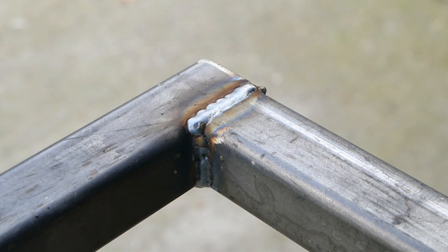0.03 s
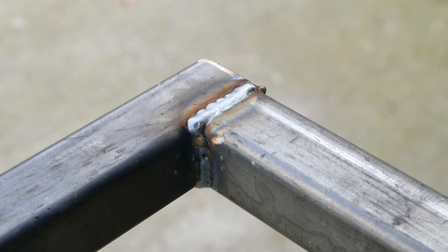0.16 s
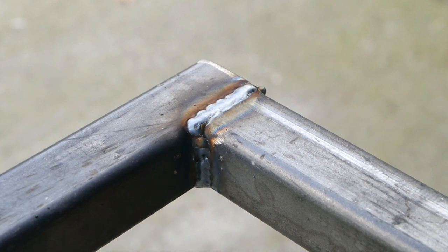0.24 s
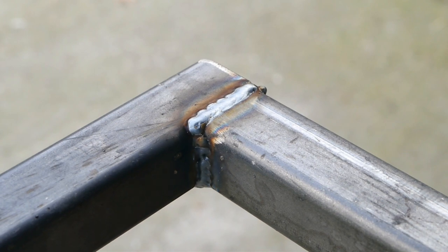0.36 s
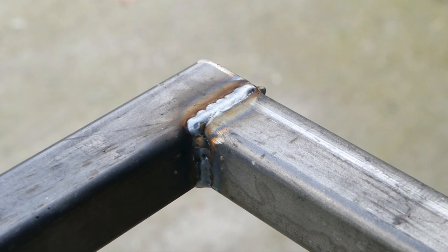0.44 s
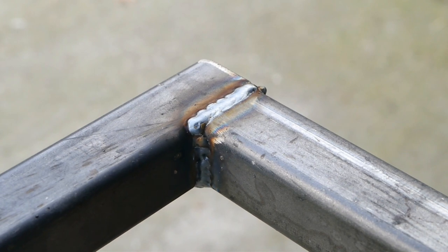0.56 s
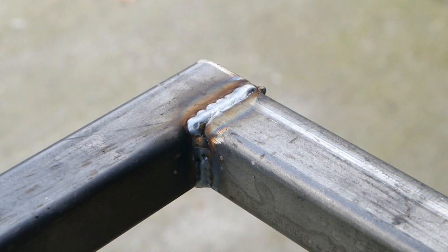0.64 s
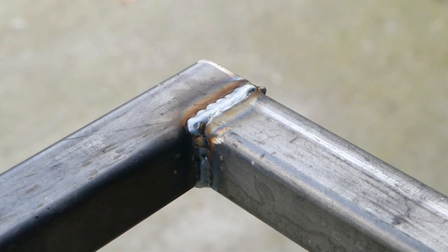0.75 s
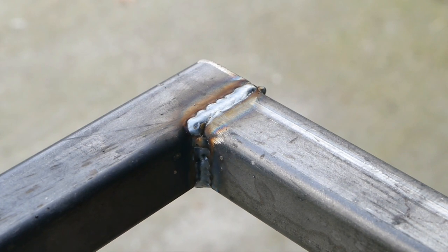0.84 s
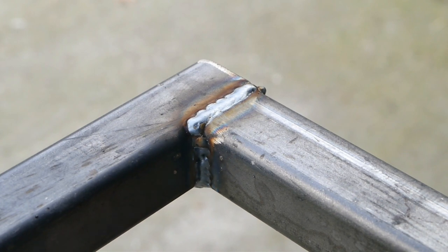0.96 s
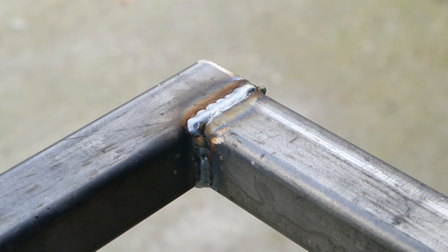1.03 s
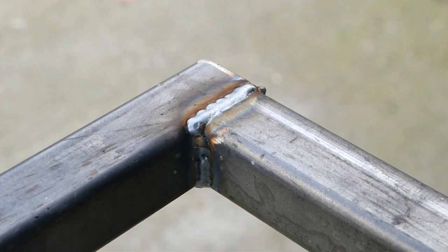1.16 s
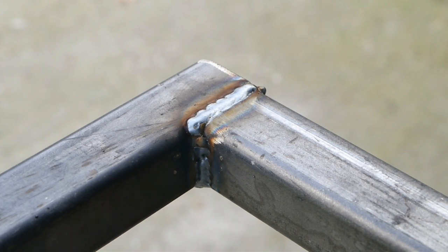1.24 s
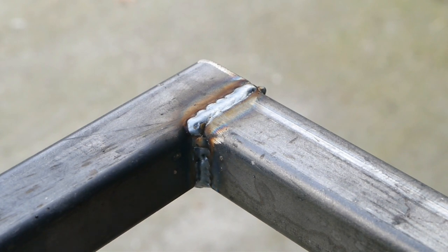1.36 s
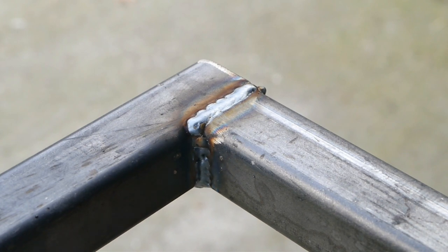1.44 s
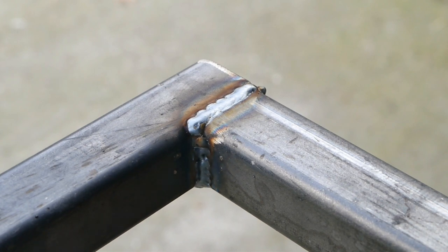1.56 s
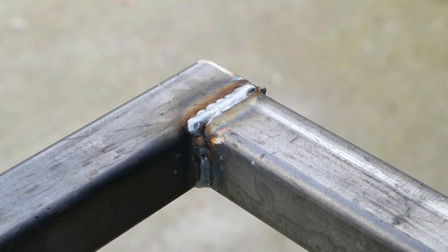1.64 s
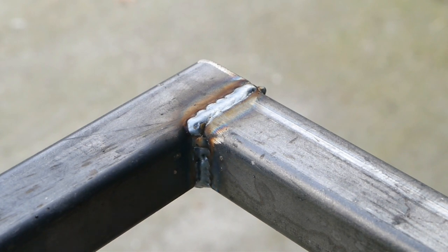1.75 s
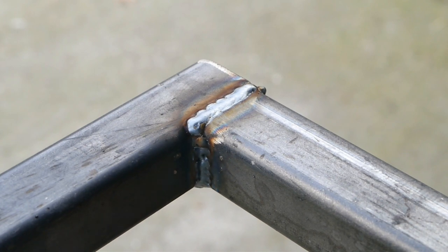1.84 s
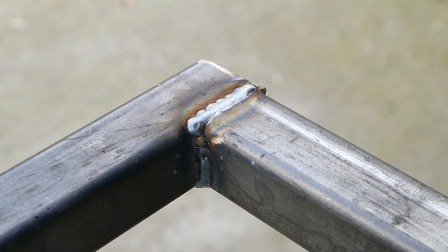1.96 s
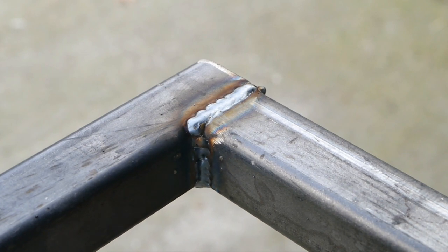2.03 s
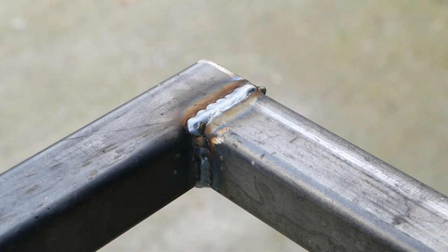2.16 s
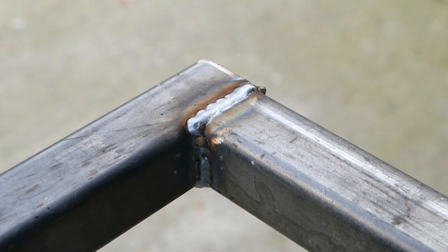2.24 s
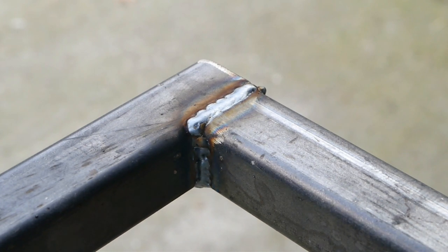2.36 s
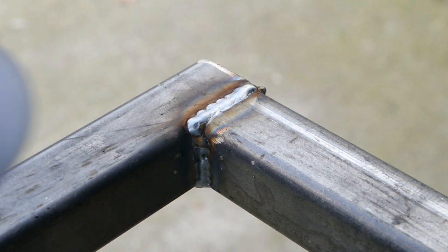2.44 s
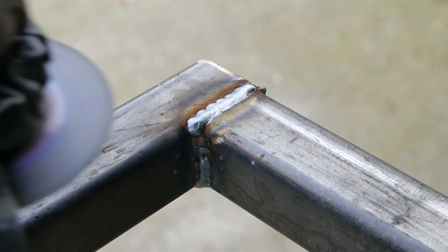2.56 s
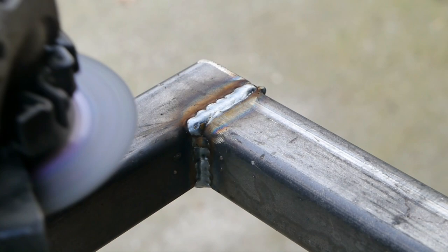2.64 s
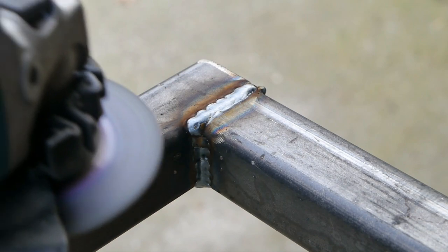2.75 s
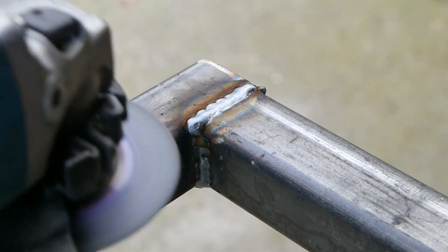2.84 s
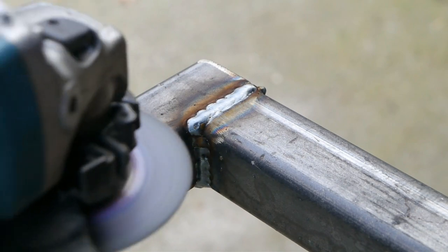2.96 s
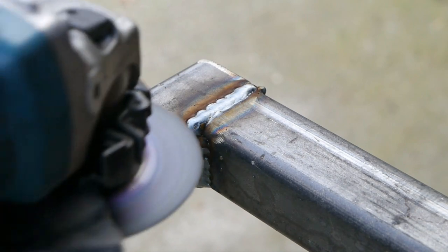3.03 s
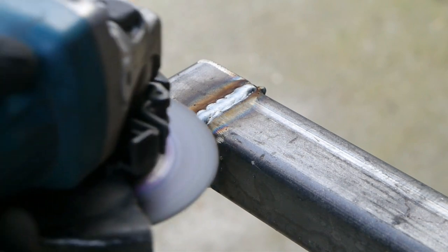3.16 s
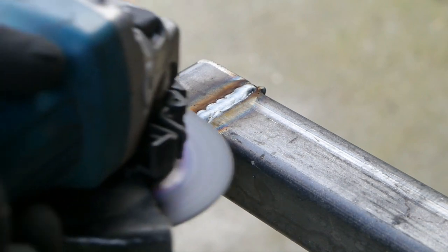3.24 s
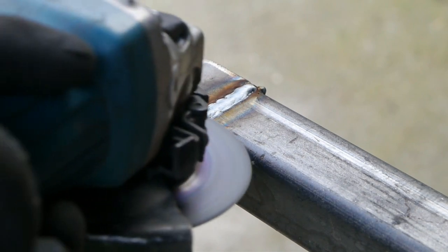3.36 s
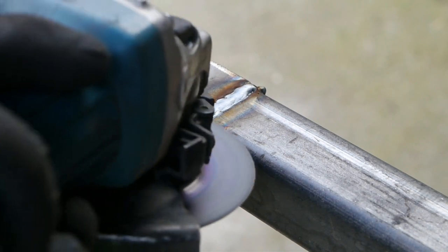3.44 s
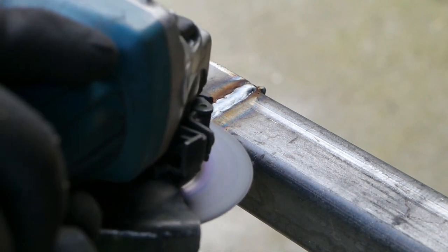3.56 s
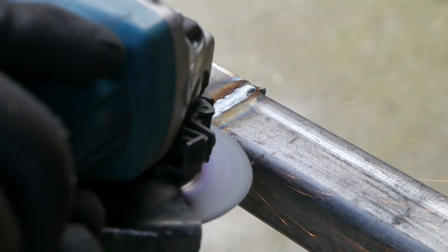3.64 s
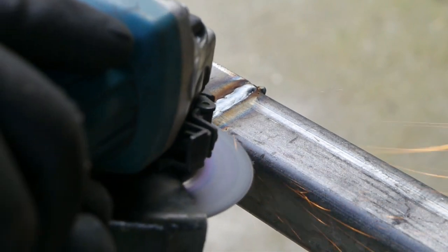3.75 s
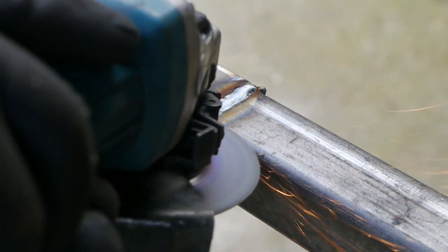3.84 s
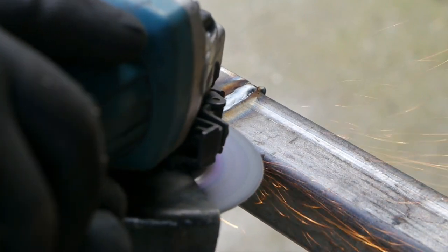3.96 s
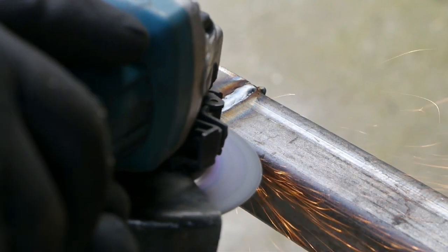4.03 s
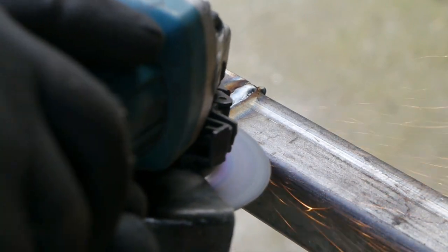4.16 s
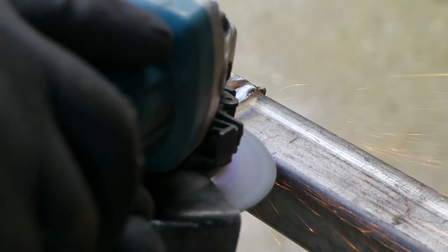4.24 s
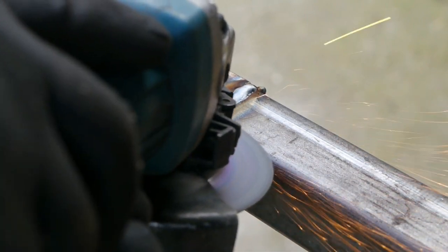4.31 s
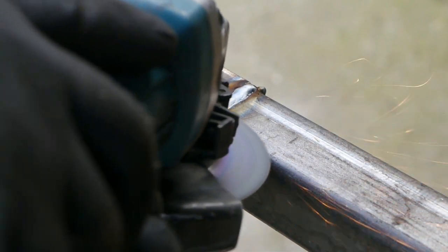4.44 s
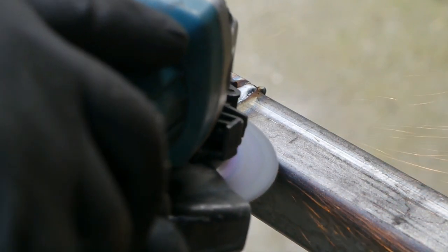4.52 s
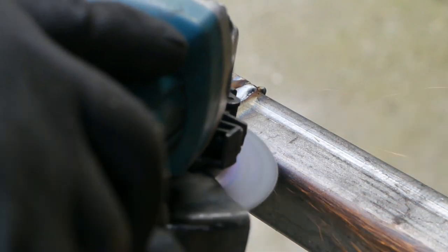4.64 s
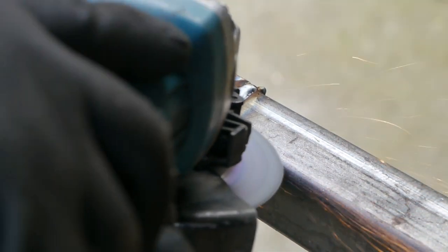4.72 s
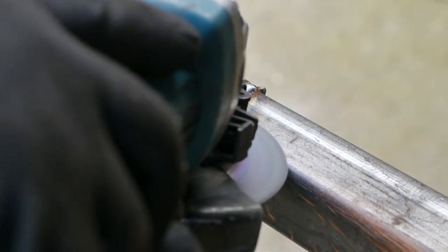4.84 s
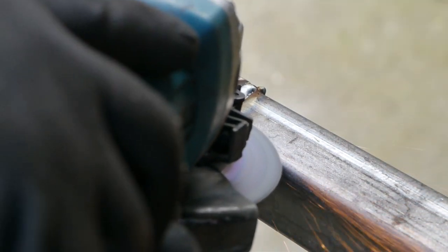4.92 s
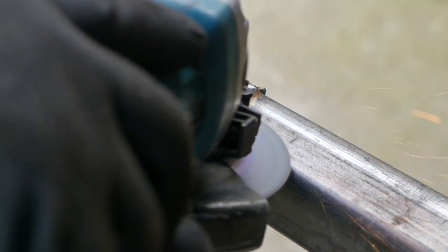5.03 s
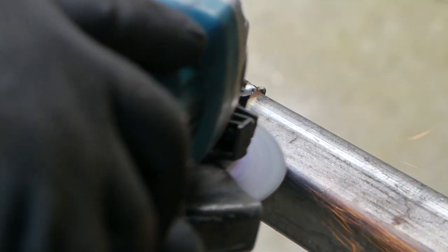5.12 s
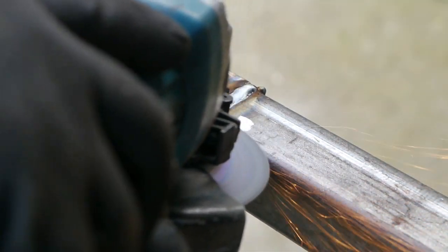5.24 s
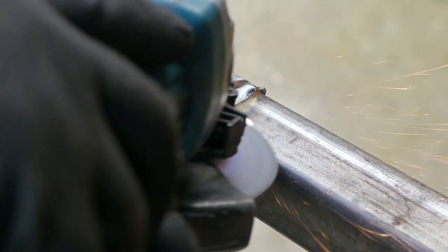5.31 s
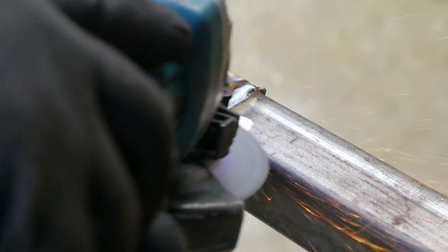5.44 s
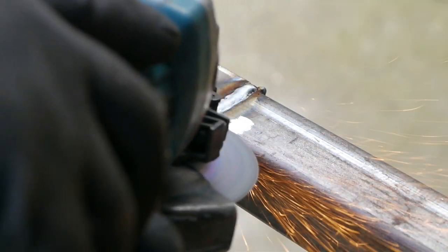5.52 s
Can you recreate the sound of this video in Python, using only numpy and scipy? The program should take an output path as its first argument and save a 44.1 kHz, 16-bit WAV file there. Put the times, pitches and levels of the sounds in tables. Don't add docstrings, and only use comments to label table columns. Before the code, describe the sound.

Close stereo microphone in a quiet open yard. Faint air, then sleeve rustle, plastic and metal taps and soft bumps as an angle grinder is handled. A scrape and very loud switch snap start the motor on the left; it chatters, climbs fast into a fan roar with rising whistle, and moves to the centre. The disc skips, then grinds steel loudly, harsh and ringing, while the motor sinks underneath.

```python
import sys
import numpy as np
from scipy import signal
from scipy.fft import rfft, irfft, next_fast_len
from scipy.io import wavfile
from scipy.ndimage import uniform_filter1d, map_coordinates

SR = 44100
rng = np.random.default_rng(int(sys.argv[2]) if len(sys.argv) > 2 else 0)


def elevation(decibels):
    levels = np.asarray(decibels, float)
    return 10 ** (levels / 20)


def wav_out(sig):
    wavfile.write(sys.argv[1], SR, np.round(np.clip(np.atleast_2d(sig).T, -1, 1) * 32767).astype(np.int16))


N = 246059
T = np.arange(N) / SR
M = next_fast_len(N)


def unit(x):
    return x / np.sqrt(np.mean(x ** 2))


def shape(points):
    hz, db = np.transpose(points)
    bins_hz = np.fft.rfftfreq(M, 1 / SR)
    return elevation(np.interp(np.log(bins_hz + 1), np.log(hz), db))


def colour(x, points, power=1):
    return irfft(rfft(x, M) * shape(points) ** power, M)[:N]


def above(x, hz):
    return colour(x, [(hz / 1.3, -40), (hz, -6), (hz * 1.3, 0)])


def band(x, lo_hz, hi_hz):
    return signal.sosfilt(signal.butter(2, [lo_hz, hi_hz], "band", fs=SR, output="sos"), x)


def ring(x, hz, width_hz):
    return signal.lfilter(*signal.iirpeak(hz, hz / width_hz, SR), x)


def walk(rate):
    k = int(SR / rate)
    held = np.repeat(rng.standard_normal(N // k + 1), k)
    return 1.23 * uniform_filter1d(uniform_filter1d(held, k), k)[:N]


def curves(table, fade_s=0.004):
    s, *columns = np.transpose(table)
    gate = np.clip(np.minimum(T - s[0], s[-1] - T) / fade_s + 1, 0, 1)
    return [np.interp(T, s, column) for column in columns] + [gate]


def pan(x, db):
    db = np.atleast_1d(db)
    return x * elevation(np.array([db, -db]) / 2)


def grains(spread_db):
    return unit(rng.standard_normal(N) * elevation(spread_db * rng.exponential(size=N)))


def yard():
    # (f/Hz, level/dB per Hz)
    air_tilt = [(15, -67), (25, -20), (175, -16.5), (439, -4), (754, -4), (2990, -10.5), (3430, -7.5),
                (3920, -10), (7310, -15), (11600, -20), (16000, -31)]
    mid, side = (colour(rng.standard_normal(N), air_tilt) for _ in range(2))
    air = unit(mid + 0.5 * side * np.array([[1], [-1]]))
    still = np.array([above(x, 130) for x in air])
    gusts = elevation(-2 + 4 * walk(7)) * (air - still)
    return elevation(-43.5 - 6) * (still + gusts)


def hands():
    # (t/s, length/s, level/dB, brightness/dB, left minus right/dB)
    rustles = [
        (0.217, 0.17, -46, -7, -17),
        (0.409, .015, -39, -13, -1),
        (.58, 0.37, -51.5, -7, 19),
        (0.988, .05, -45, 6.5, 7),
        (1.098, 0.15, -49, -5, 13),
        (1.37, 0.064, -52, 3.5, 5),
        (1.448, 0.11, -50, -9, 9),
        (1.727, .04, -43, 4, 10),
        (1.79, 0.072, -48, -9, 9),
    ]
    attack_s, release_s = 0.013, 0.034
    low = elevation(1.4 * walk(25)) * unit(band(grains(2.2), 300, 2500))
    high = elevation(1.4 * walk(30)) * unit(band(grains(2.6), 2600, 12000))
    out = 0
    for s, length, db, bright_db, pan_db in rustles:
        rise = np.clip((T - s) / attack_s, 0, 1)
        fall = np.exp(-np.clip(T - s - length, 0, None) / release_s)
        out = out + pan(elevation(db - 6.5) * rise * fall * (low + elevation(bright_db) * high), pan_db)
    return out


def stand_bumps():
    # (t/s, peak/dB, f/Hz)
    thumps = [
        (0.1, -52, 108),
        (0.357, -40, 250),
        (0.379, -43, 226),
        (0.689, -58, 115),
        (1.73, -50, 210),
        (1.559, -52, 180),
        (1.608, -52, 156),
    ]
    out = 0
    for s, db, hz in thumps:
        t = np.clip(T - s, 0, None) / 0.0073
        out = out + elevation(db + 10.5) * t * np.exp(-t) * np.sin(2 * np.pi * hz * (T - s))
    return out


def switch_scrape():
    # (t/s, level/dB)
    slide = [
        (1.834, -37),
        (1.862, -28),
        (1.88, -32),
        (1.894, -31),
    ]
    db, gate = curves(slide)
    return gate * elevation(db - 1 + 3 * walk(150)) * unit(band(grains(1.4), 700, 9500))


def knocks():
    # (t/s, peak/dB, ring f/Hz, left minus right/dB)
    body_taps = [
        (.246, -22.5, 2500, -2.5),
        (.315, -23.5, 2500, -3),
        (.387, -33, 2900, -5),
        (.4903, -39, 1500, 9),
        (1.716, -39, 1000, 4),
        (1.859, -26, 970, -2),
    ]
    guard_taps = [
        (.7825, -23, 2660, -9),
        (1.3655, -14.5, 2480, 10.5),
        (1.4547, -24, 2760, 12),
        (1.5301, -22, 2600, 10),
    ]
    handle_taps = [
        (.414, -20, 2620, -14.5),
        (.988, -19, 2660, 5),
        (1.1676, -16, 2290, 7.5),
    ]
    cable_taps = [
        (.266, -32.5, 3500, 8),
        (.5764, -29.5, 1700, -8),
        (.9885, -30, 3000, 4),
        (.996, -30, 2100, 3),
        (1.73, -26, 2900, 6),
        (1.739, -34, 2500, 1),
        (1.8448, -32, 969, 7),
    ]
    switch_taps = [
        (1.8955, -5, 3000, 9),
        (1.8975, -2, 1750, 13.3),
    ]
    stand_taps = [
        (.3558, -32.5, 1300, -2),
    ]
    ping_taps = [
        (.422, -40, 2600, -8),
        (1.869, -34, 3000, 3),
    ]
    # taps, then thud/dB, lowest thud f/Hz, tick/dB, crack/dB
    struck = [(body_taps, 3.5, 200, -20, -23), (guard_taps, -10, 900, -6, -27),
              (handle_taps, -25, 300, -13, -25), (cable_taps, -5, 300, -7, -2),
              (switch_taps, -12, 300, -7, -9), (stand_taps, 15, 200, -16, -22),
              (ping_taps, -20, 300, 10, -12)]
    t = T[:8192]
    out = np.zeros((2, N + len(t)))
    for taps, thud_db, thud_hz, tick_db, crack_db in struck:
        for s, db, hz, pan_db in taps:
            noise = rng.standard_normal(len(t))
            burst = noise * (np.exp(-t / 0.0015) + 0.22 * np.exp(-t / 0.014))
            mid = band(band(burst, 1090, 3800) + 1.5 * ring(burst, hz, 270), 670, 3370)
            thud = band(noise * np.exp(-t / 0.011), 348, 1440) + 0.74 * ring(burst, 275, 35)
            thud = band(thud, thud_hz, 1900)
            rattle = burst + 0.07 * noise * np.exp(-t / 0.035)
            tick = band(burst, 4600, 6800) + 4 * ring(rattle, 5900, 200)
            tick = band(band(tick, 4600, 7000), 4200, 7200)
            crack = band(burst + 0.07 * noise * np.exp(-t / 0.028), 9000, 12300)
            parts = (0, mid), (thud_db, thud), (tick_db, tick), (crack_db, crack)
            tap = sum(elevation(part_db) * part / np.abs(part).max() for part_db, part in parts)
            i = int(s * SR)
            out[:, i:i + len(t)] += pan(tap, pan_db) * elevation(db - 2)
    return out[:, :N]


def roar():
    # (f/Hz, level/dB per Hz)
    roar_tilt = [(24, -70), (40, -48), (231, -32), (402, -11), (600, -1), (733, -3), (942, 4.5),
                 (1590, 4.5), (2260, 3), (2570, 0), (5720, 6.5), (11600, -1), (13400, -4), (16000, -23)]
    # (f/Hz, width/Hz, level/dB)
    housing = [(745, 69, 3), (926, 80, -14), (1830, 500, -17), (2790, 650, -1), (4350, 630, -12),
               (5760, 480, -19)]
    air = grains(1.77) * elevation(0.57 * walk(40))
    air = air + sum(elevation(db + 0.92 * walk(8.9)) * ring(air, hz, width) for hz, width, db in housing)
    return unit(colour(air, roar_tilt))


def gear_clatter(turn):
    # (f/Hz, width/Hz, level/dB, from t/s, to t/s)
    backlash = [
        (1800, 140, -27, 1.9, 1.945),
        (3150, 380, -26, 1.94, 2.03),
        (5800, 500, -29, 1.93, 2.07),
        (9700, 600, -30, 1.93, 2.03),
        (1100, 400, -36, 1.92, 2.08),
    ]
    turns_per_slap = 5
    slaps = grains(1.3) * np.exp(0.85 * np.cos(turn / turns_per_slap + 1.1 * walk(40)))
    out = 0
    for hz, width, db, t0, t1 in backlash:
        clatter = unit(ring(ring(slaps, hz, width), hz, 2 * width))
        swell = np.clip(np.minimum((T - t0) / 0.0054, (t1 - T) / 0.055 + 1), 0, 1)
        out = out + elevation(db) * clatter * swell
    return out


def commutator_whistle(hz):
    bars_per_turn, vent_hz, vent_width_hz = 31, 12400, 650
    bars_hz = bars_per_turn * hz
    whistle = np.sin(2 * np.pi * np.cumsum(bars_hz * (1 + 0.0078 * walk(300))) / SR)
    rise = np.clip((T - 2.0) / 0.03, 0, 1)
    whistle = rise * elevation(3 * walk(120) + walk(25)) * whistle
    whistle = whistle * elevation(-0.012 * np.maximum(bars_hz - 14800, 0))
    vent = ring(ring(whistle, vent_hz, vent_width_hz), vent_hz, vent_width_hz)
    return elevation(-38) * (whistle + elevation(15.5) * vent)


def motor(air):
    # (t/s, turns f/Hz)
    armature = [(1.9, 341), (2.04, 383.5), (2.105, 430), (2.21, 480), (2.4, 532), (2.64, 575.7),
                (2.95, 605.3), (3.615, 628.4)]
    # (t/s, left minus right/dB)
    carry = [
        (1.9, 9),
        (2.05, 10.5),
        (2.4, 4.5),
        (3.0, 1.4),
        (3.62, 0.5),
    ]
    hz, gate = curves(armature)
    speed = np.log10(hz / 629)
    since = np.clip(T - armature[0][0], 0, None)
    roar_db = -17.5 + 17.5 * speed - 5 * np.exp(-since / 0.02)
    treble_db = -4 + 38 * speed
    low_db = -8.5 + 9 * np.exp(-since / 0.034)
    hum_db = -44.5 + 0.105 * np.minimum(hz - 470, 0)
    turn = 2 * np.pi * np.cumsum(hz) / SR
    hum = np.sqrt(2) * elevation(hum_db + 1.5 * walk(18)) * np.sin(turn)
    top = above(air, 8000)
    low = air - above(air, 2500)
    body = unit(air - top - low) + elevation(treble_db) * unit(top) + elevation(low_db) * unit(low)
    body = elevation(roar_db - 1.1) * body
    sound = body + gear_clatter(turn) + hum + commutator_whistle(hz)
    return pan(gate * sound, curves(carry)[0])


def disc_grit(turns, wear=0.05):
    fresh = rng.standard_normal((int(turns[-1]) + 2, 256)) * elevation(1.5 * rng.exponential(size=256))
    worn = signal.lfilter([1], [1, wear - 1], fresh, axis=0)
    rim = signal.resample(worn, 2048, axis=1)
    return unit(map_coordinates(rim, [turns, turns % 1 * 2048], order=1, mode="wrap"))


def singing(turns):
    # (order of the disc turn, from t/s, to t/s, level/dB)
    orders = [(27, 3.76, 4.0, -34), (27, 4.05, 4.3, -36), (27, 4.35, 4.62, -34.5), (26, 4.35, 4.5, -37),
              (28, 4.4, 4.6, -32.5), (28, 4.7, 4.8, -37), (14, 4.35, 4.55, -41), (15, 4.3, 4.58, -41),
              (8, 3.96, 4.35, -43), (9, 4.2, 4.6, -46), (10, 4.2, 4.85, -44), (12, 4.27, 4.56, -36),
              (13, 4.1, 4.6, -40.5), (16, 4.4, 4.52, -37), (15, 4.85, 4.8, -39.5), (13, 4.69, 4.95, -44),
              (14, 5.05, 5.16, -36), (23, 5.08, 5.25, -38), (23, 5.44, 5.6, -32), (28, 5.41, 5.62, -29.5),
              (8, 5.15, 5.58, -43)]
    out = 0
    for order, t0, t1, db in orders:
        swell = np.clip(np.minimum(T - t0, t1 - T) / 0.14 + 0.46, 0, 1)
        out = out + elevation(db + 3.5 + 1.8 * walk(25)) * swell * np.sin(2 * np.pi * order * turns)
    return out


def grinding(air):
    # (t/s, peak/dB, length/s)
    touches = [
        (3.6114, -1, 0.0073),
        (3.636, -11, 0.0089),
        (3.661, -11, 0.0071),
        (3.73, -7.5, 0.0098),
        (3.743, -15, 0.012),
        (3.773, -11, 0.0099),
        (3.8144, -15, 0.0071),
    ]
    # (t/s, pressure/dB, flatness of the contact 0-1)
    press = [(3.615, -28, 0.17), (3.725, -29, 0.57), (3.79, -26.5, 0.45), (3.835, -21.5, 0.55),
             (3.89, -23, 0.3), (4.14, -20, 0.43), (4.3, -20.5, 0.53), (4.45, -21, 0.72), (4.64, -21, 0.12),
             (4.69, -26, 0.39), (4.78, -22, 0.92), (4.825, -19.5, 0.58), (4.89, -25, 0.63),
             (4.93, -23, 0.82), (5.13, -20, 0.77), (5.23, -26, 0.45), (5.31, -20, 0.78),
             (5.58, -21.5, 0.44)]
    # (t/s, turns f/Hz)
    disc = [
        (3.6, 171.6),
        (4.08, 169.8),
        (4.58, 163.3),
        (5.28, 161.3),
        (5.58, 158.7),
    ]
    # (f/Hz, width/Hz, level/dB near the corner, level/dB further along)
    tube_modes = [(1330, 89, -14, -11), (1636, 43, -4, -9), (2100, 280, -6, -13), (2450, 100, -9, 0.5),
                  (2610, 30, -5, -19), (3400, 240, -3, -4), (3714, 51, -14, 9.5), (4440, 78, -9, 0),
                  (4620, 66, 4, 5.5), (5840, 350, -5, -4.5), (6570, 340, 3.5, -1), (7950, 250, 5, -2),
                  (8710, 84, -9, 4), (9230, 120, 2.5, -1), (10070, 200, 9.5, -2), (10900, 250, -6, 0),
                  (12450, 330, 6.5, 7), (14630, 190, 2, 8)]
    # (f/Hz, level/dB per Hz)
    grit_tilt = [(180, -59), (300, -34.5), (737, -15), (2930, -2.5), (3890, -6), (10200, -0.5),
                 (12700, -3.5), (14000, -11), (15200, -5.5), (16000, -36)]
    # (f/Hz, left minus right/dB)
    lean = [(60, 0.0), (110, 0.0), (200, -2), (380, 1), (700, 0), (1290, -1), (2380, -2), (4400, -1.5),
            (8120, 0), (15000, 0.5)]
    bite_db, flat, gate = curves(press)
    harder = bite_db + 22
    body_db = -10 + 9 * flat - 0.78 * harder
    motor_db = -50 + 10.5 * flat - 0.94 * harder
    repeat = np.clip(0.44 + 0.45 * flat + 0.02 * harder, 0, 1)
    turns = np.cumsum(curves(disc)[0]) / SR
    shake = np.clip(turns + 0.0016 * walk(50), 0, None)
    grit = np.sqrt(repeat) * disc_grit(shake) + np.sqrt(1 - repeat) * grains(1.4)
    wobble = 0.19 * np.cos(2 * np.pi * turns) + 0.34 * np.cos(4 * np.pi * turns + 3.74)
    grit = grit * (1 + wobble)
    along = 1 / (1 + np.exp((4.68 - T) / 0.16))
    tube = grit
    for hz, width, corner_db, along_db in tube_modes:
        mode_db = corner_db + (along_db - corner_db) * along + 1.2 * walk(7)
        tube = tube + elevation(mode_db) * ring(grit, hz, width)
    tube = colour(tube, grit_tilt)
    top = above(tube, 6500)
    pressed = unit(top) + elevation(body_db + 0.5) * unit(tube - top)
    pressed = gate * elevation(bite_db - 0.78 + 0.5 * walk(30)) * pressed
    graze = 0
    for s, db, length in touches:
        graze = graze + elevation(db - 10.5) * np.clip(np.minimum(T - s, s + length - T) / 0.0018, 0, 1)
    ducked = gate * elevation(motor_db + 2.5 * along + 10) * air
    sound = pressed + singing(shake) + graze * unit(above(tube, 7000)) + ducked
    return np.array([colour(sound, lean, half) for half in (0.5, -0.5)])


def scene():
    # (f/Hz, level/dB)
    side_tilt = [(60, -6), (110, -4), (200, -36), (380, -25), (700, -25), (1290, -16), (2380, -8),
                 (4400, -8.5), (8120, -10), (15000, -8)]
    air = roar()
    direct = hands() + stand_bumps() + switch_scrape() + knocks() + motor(air) + grinding(air)
    t = T[:4096]
    scatter = rng.standard_normal((2, len(t))) * np.exp(-t / 0.039) * (t > 0.0012)
    scatter = scatter / np.sqrt(np.sum(scatter ** 2, axis=1, keepdims=True))
    both, across = signal.fftconvolve(direct.mean(axis=0)[None], scatter, axes=1)[:, :N]
    side = elevation(1.0) * colour(across, side_tilt) * np.array([[1], [-1]])
    return direct + elevation(-14) * both + side + yard()


def band_limit(x):
    return signal.sosfilt(signal.butter(12, 16910, fs=SR, output="sos"), x)


def record(dry):
    rounded = np.tanh(dry)
    cut = signal.sosfilt(signal.ellip(6, 0.3, 60, 15750, fs=SR, output="sos"), rounded)
    return band_limit(cut)


dry = scene()
out = record(dry)
wav_out(out)
```